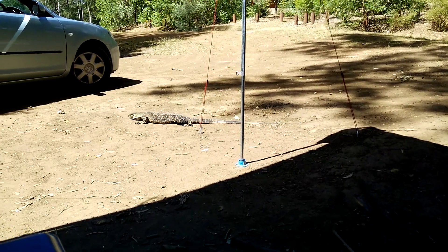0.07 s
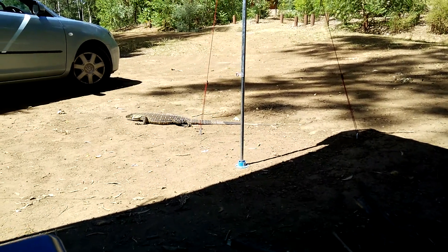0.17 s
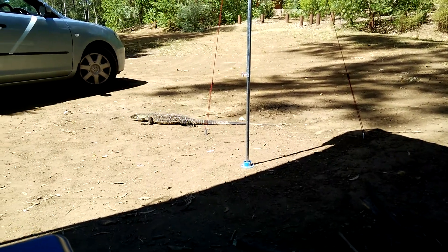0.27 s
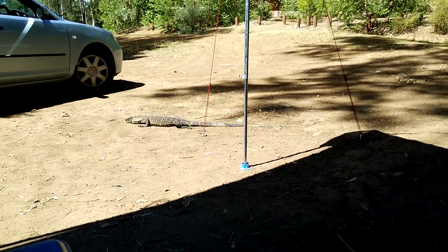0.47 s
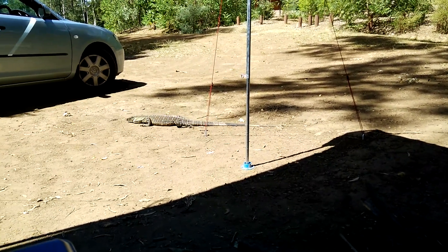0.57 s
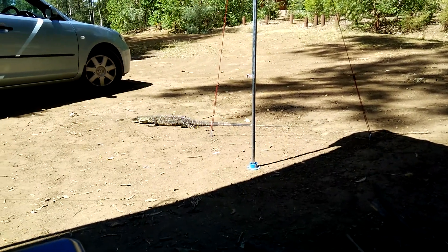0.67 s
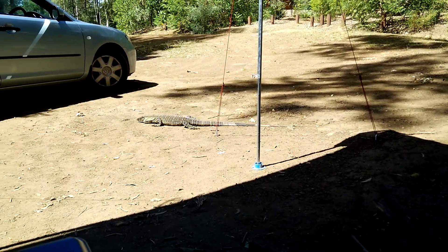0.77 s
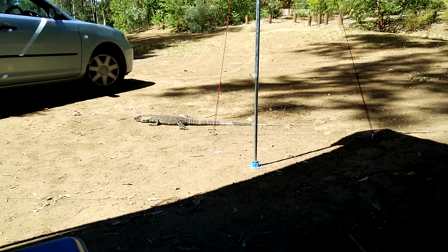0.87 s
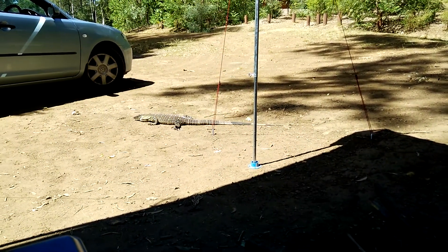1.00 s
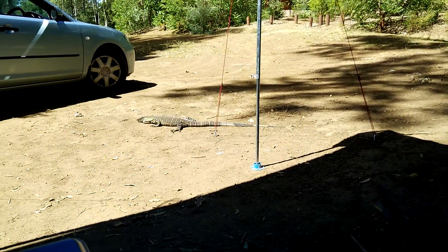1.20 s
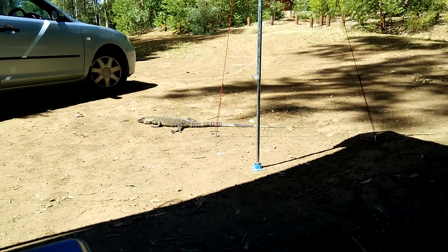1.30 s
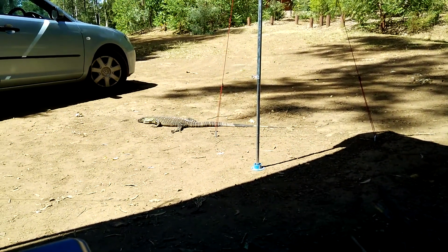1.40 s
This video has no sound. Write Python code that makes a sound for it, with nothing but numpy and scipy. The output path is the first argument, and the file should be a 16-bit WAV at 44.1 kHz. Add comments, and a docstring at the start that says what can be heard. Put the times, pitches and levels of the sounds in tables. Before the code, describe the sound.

A high, flickering insect hiss carries on over the low hum and thump of a small motor in a dry clearing. A quick rising birdlike squeak ends in a soft bump, then a sharp knock sounds close by.

```python
"""Hiss and motor in a dry clearing

A high, insect-like hiss flickers over the low hum and thump of a small motor, and surges on a few
strong beats. A thin whistle comes and goes. One rising, bird-like squeak ends in a soft bump and
scuffle, and a sharp knock and a few faint taps sound close by, each a click with a brief ring.
Far birds, a low rustle and still air lie behind it all."""
import sys
import numpy as np
from scipy import signal
from scipy.fft import rfft, irfft
from scipy.io import wavfile
from scipy.ndimage import uniform_filter1d

SR = 44100
rng = np.random.default_rng(int(sys.argv[2]) if len(sys.argv) > 2 else 0)


def wav_record(signal):
    """Record a signal, one row per channel, as 16-bit PCM in the file named by sys.argv[1]."""
    frames = np.transpose(np.atleast_2d(signal))
    bounded = np.clip(frames, -1, 1)
    # unit amplitude maps onto the largest positive 16-bit level
    quanta = np.round(bounded * 32767).astype(np.int16)
    wavfile.write(sys.argv[1], SR, quanta)


N = 63945
BEAT_HZ, BEAT_AT_S = 26.87, .398  # the motor's beats per second, and the time of one beat


def undb(db):
    """Turn decibels into a number to multiply by."""
    return 10 ** (np.asarray(db) / 20)


def unit(x):
    """Scale a signal to an average (rms) size of 1."""
    return x / np.sqrt(np.mean(x ** 2))


def curve(t, rows, axis=1):
    """Join one column of a table with straight lines."""
    rows = np.array(rows, float)
    return np.interp(t, rows[:, 0], rows[:, axis])


def colour(x, points):
    """Filter a sound through (Hz, dB) points."""
    size = 2 ** 17
    hz, db = np.array(points, float).T
    bins_hz = np.maximum(np.arange(size // 2 + 1) * SR / size, 1)
    gain = undb(np.interp(np.log(bins_hz), np.log(hz), db))
    cepstrum = irfft(np.log(gain))
    cepstrum[1:size // 2] *= 2  # folded so the filter rings after a sound, never before
    cepstrum[size // 2 + 1:] = 0
    return irfft(rfft(x, size) * np.exp(rfft(cepstrum)))[:N]


def noise(points):
    """Noise of size 1, shaped by (Hz, dB) points."""
    return unit(colour(rng.standard_normal(N), points))


def drift(rate):
    """A smooth random wander of size 1, with `rate` steps a second."""
    steps = rng.standard_normal(2 ** 12)
    held = steps[(np.arange(N) * rate / SR).astype(int)]
    return unit(uniform_filter1d(held, int(SR / rate)))


def ring(t, hz, t60):
    """A tone that starts at t = 0 and fades by 60 dB in its ring time, t60."""
    age = np.maximum(t, 0)
    return np.sin(2 * np.pi * hz * age) * np.exp(-np.log(1000) * age / t60)


# Beats that stand out. Each row: time in seconds, extra level in dB.
ACCENTS = [(.324, 7.5), (.621, 5.5), (0.991, 6.5), (1.108, 1.5)]
SURGE_S = .0058  # how far a surge spreads to each side of its peak

def accent(t):
    """Extra dB for the hiss and the thumps around the strong beats."""
    return sum(db * np.exp(-((t - at) / SURGE_S) ** 2) for at, db in ACCENTS)


# The tone of the hiss. Each row: frequency in Hz, level in dB.
HISS_COLOUR = [(2500, -34.5), (3200, -23), (3600, -13), (4020, -4.5), (4300, -10.5), (4690, -8),
               (4850, -4.5), (5080, -3), (5300, -1), (5450, 0), (5620, -1.5), (6000, -9.5), (6500, -22),
               (7200, -34.5), (8500, -45)]

def insect_hiss(t):
    """A shrill, flickering hiss that surges on a few strong motor beats."""
    turns = (t - BEAT_AT_S) * BEAT_HZ
    from_beat_s = (turns - np.round(turns)) / BEAT_HZ
    ripple_db = .5 * np.exp(-(from_beat_s / SURGE_S) ** 2) * (1 + .15 * drift(BEAT_HZ))
    hiss = noise(HISS_COLOUR)
    flicker_db = 1.5 * drift(170)
    return undb(-61) * unit(hiss * undb(ripple_db + accent(t) + flicker_db))


# The tones of the hum. Each row: multiple of the beat rate, level in dB.
HUM_TONES = [(2, -63), (3, -78), (4, -68), (5, -62), (6, -74)]
# How all but the lowest tone swell. Each row: time in seconds, change in dB.
UPPER_HUM_SWELL = [(0, -3.5), (.27, -1.5), (.67, 3.5), (.9, 2.5), (1.45, -4.5)]
# What each beat sets ringing. Each row: pitch in Hz, ring time in seconds, level in dB.
THUMP_RINGS = [(95, 0.16, -1.5), (118, .06, -13.5)]
THUMP_LEAD_S, THUMP_JITTER_S, THUMP_SCATTER_DB = .003, .002, 4

def motor(t):
    """A small motor hums on multiples of its beat and thumps a little unevenly at each beat."""
    turns = (t - BEAT_AT_S) * BEAT_HZ
    tones = [np.sqrt(2) * undb(db) * np.cos(2 * np.pi * k * turns) for k, db in HUM_TONES]
    hum = tones[0] + undb(curve(t, UPPER_HUM_SWELL)) * sum(tones[1:])
    beats = BEAT_AT_S + np.arange(np.floor(turns[0]), turns[-1]) / BEAT_HZ
    kicks = np.zeros(N)
    for at, (late, size) in zip(beats, rng.standard_normal((len(beats), 2))):
        start = int((at - THUMP_LEAD_S + THUMP_JITTER_S * late) * SR)
        if 0 <= start < N:
            kicks[start] = undb(THUMP_SCATTER_DB * size + accent(at))
    body = sum(undb(db) * ring(t, hz, t60) for hz, t60, db in THUMP_RINGS)
    thumps = unit(signal.fftconvolve(kicks, body)[:N])
    return hum + undb(-67) * thumps


# The squeak's rise. Each row: time in seconds, pitch in Hz, level in dB before filtering.
SQUEAK_GLIDE = [(.212, 1912, -80), (.227, 2143, -46.5), (.233, 2250, -47), (.238, 2310, -35.5),
                (.243, 2440, -41), (.2472, 2583, -43.5), (.2495, 2618, -24), (.252, 2750, -31),
                (.254, 2897, -38.5), (.261, 2964, -49.5)]
# Its harmonics. Each row: multiple of the pitch, level in dB.
SQUEAK_TONES = [(1, -1), (2, 0), (3, -1), (4, 1)]
# The resonance that filters them. Each row: frequency in Hz, boost or cut in dB.
SQUEAK_RESONANCE = [(1900, -12), (2300, -23), (2650, -29), (2900, -15.5), (3600, -15), (4250, -18.5),
                    (4650, 0.5), (5400, -1), (6000, -2), (6500, -13), (7100, -23.5), (8200, -41),
                    (12000, -48)]

def squeak(t):
    """A quick upward glide whose second harmonic crosses a resonance; a short tail follows."""
    hz = curve(t, SQUEAK_GLIDE) * (1 + .006 * drift(740))  # a slightly rough pitch
    phase = 2 * np.pi * np.cumsum(hz) / SR
    outside_s = np.maximum(SQUEAK_GLIDE[0][0] - t, 0) + np.maximum(t - SQUEAK_GLIDE[-1][0], 0)
    strength = np.sqrt(2) * undb(curve(t, SQUEAK_GLIDE, axis=2)) * np.exp(-outside_s / .006)
    tones = sum(undb(db) * np.sin(k * phase) for k, db in SQUEAK_TONES)
    direct = colour(strength * tones, SQUEAK_RESONANCE)
    fade = np.exp(-np.log(1000) * t / .06)  # down 60 dB in .06 seconds
    tail = unit(rng.standard_normal(N) * fade) / np.sqrt(N)
    return direct + undb(-12) * signal.fftconvolve(direct, tail)[:N]


# Bumps under the squeak. Each row: start in seconds, level in dB, pitch in Hz, ring time in seconds.
SOFT_BUMPS = [(0.2461, -33, 85.5, .035), (0.2665, -45.5, 110, 0.041)]
# The tone of the rub. Each row: frequency in Hz, level in dB.
RUB_COLOUR = [(120, -6), (280, 0.5), (650, 0), (1050, -10), (1600, -24.5), (3000, -24.5), (4200, -3),
              (5400, -24), (7000, -17.5), (10000, -48), (14000, -40)]
RUB_AT_S, RUB_RISE_S, RUB_HOLD_S, RUB_FADE_S = .246, .0062, .014, .0039

def scuffle(t):
    """Two soft bumps with a short, dull rub between them."""
    age = t - RUB_AT_S
    rise = np.clip(age / RUB_RISE_S, 0, 1)
    fade = np.exp(-np.maximum(age - RUB_RISE_S - RUB_HOLD_S, 0) / RUB_FADE_S)
    bumps = sum(undb(db) * ring(t - at, hz, t60) for at, db, hz, t60 in SOFT_BUMPS)
    return bumps + undb(-46.5) * rise * fade * noise(RUB_COLOUR)


# The knock and taps. Each row: start in seconds, click's peak in dB, treble tilt in dB per octave.
BLOWS = [(0.1487, -46.5, 3), (0.1721, -51, -1), (0.383, -43.5, -0.5), (0.8268, -22, 2.5),
         (0.849, -54.5, -5), (0.9214, -47.5, -4.5)]
# The tone of the knocked object. Each row: frequency in Hz, level in dB.
CLICK_COLOUR = [(40, -9), (120, 10.5), (350, 2.5), (520, 7.5), (800, 1.5), (1000, 4), (1800, -4.5),
                (2400, -13.5), (3000, -14.5), (4200, -15.5), (5400, -10.5), (6000, -13), (6600, -18),
                (8400, -37.5), (10300, -31.5), (12000, -52), (14000, -55)]
# What rings on. Each row: pitch in Hz, ring time in seconds, dB compared with the click's peak.
KNOCK_RINGS = [(121.3, 0.11, -24.5), (530, .014, -29), (5390, 0.038, -29), (5750, 0.017, -27)]

def knocks(t):
    """Dry blows on one well-damped object: a click, then a brief ring. Some are dull, some crisp."""
    out = np.zeros(N)
    for at, db, tilt in BLOWS:
        treble_db = lambda hz: tilt * np.log2(max(hz / 1000, 1))
        blow = signal.unit_impulse(N, int(at * SR))
        click = colour(blow, [(hz, level + treble_db(hz)) for hz, level in CLICK_COLOUR])
        rings = sum(undb(level + treble_db(hz)) * ring(t - at, hz, t60)
                    for hz, t60, level in KNOCK_RINGS)
        out += undb(db) * (click / np.abs(click).max() + rings)
    return out


# How the whistle comes and goes. Each row: time in seconds, level in dB.
WHISTLE_LEVEL = [(0, -83), (.1, -97), (.15, -69), (.2, -66.5), (.225, -62.5), (.26, -59), (.3, -78),
                 (.326, -66), (.37, -78.5), (.78, -78), (.83, -71.5), (.88, -79), (1.05, -81),
                 (1.09, -71.5), (1.22, -79), (1.275, -71.5), (1.35, -89.5), (1.396, -75), (1.45, -91)]
WHISTLE_HZ, WHISTLE_WOBBLE_HZ = 2869, 27

def whistle(t):
    """A thin, fluttering tone that swells and fades."""
    hz = WHISTLE_HZ + WHISTLE_WOBBLE_HZ * drift(130)
    tone = np.sqrt(2) * np.sin(2 * np.pi * np.cumsum(hz) / SR)
    flutter = unit(1 + .47 * drift(150))
    return tone * flutter * undb(curve(t, WHISTLE_LEVEL))


# Bird notes. Each row: start and length in seconds, first and last pitch in Hz, level in dB.
BIRD_NOTES = [(.9, 0.053, 3660, 3220, -67), (0.988, 0.0517, 4690, 4100, -65)]
# How a distant tone swells and dips. Each row: time in seconds, change in dB.
TONE_SWELL = [(0, -0.5), (.5, -1), (.9, -9.5), (1.12, 1), (1.28, -9.5), (1.45, -6)]
TONE_HZ, TONE_DB = 825, -90

def far_birds(t):
    """Faint, blurred falling notes over a barely audible tone in the distance."""
    out = undb(TONE_DB + curve(t, TONE_SWELL)) * np.sin(2 * np.pi * TONE_HZ * t)
    for at, length, start_hz, end_hz, db in BIRD_NOTES:
        progress = np.clip((t - at) / length, 0, 1)
        hz = end_hz + (start_hz - end_hz) * (1 - progress) ** 2
        hz *= 1 + .047 * drift(450)  # a fast wobble blurs the pitch
        out += undb(db) * np.sin(np.pi * progress) * np.sin(2 * np.pi * np.cumsum(hz) / SR)
    return np.sqrt(2) * out


# How loud the rustle is. Each row: time in seconds, level in dB.
RUSTLE_LEVEL = [(0, -85.5), (.2, -72), (.33, -79.5), (.5, -81), (.8, -81), (1.05, -89), (1.45, -99)]
# Its tone. Each row: frequency in Hz, level in dB.
RUSTLE_TONE = [(80, -6), (200, -2.5), (380, 0.5), (700, -12), (1600, -14.5), (4000, -29.5)]

def rustle(t):
    """A faint, uneven low rustle that dies away."""
    return noise(RUSTLE_TONE) * undb(curve(t, RUSTLE_LEVEL) + 3.8 * drift(30))


# The air in the middle. Each row: frequency in Hz, level in dB.
AIR_COLOUR = [(20, -8.5), (45, -6), (90, -0.5), (170, -7), (260, -14.5), (500, -22), (1000, -27),
              (2200, -21.5), (6000, -24), (10000, -32), (12000, -33), (14500, -34)]
# The air at the sides. Each row: frequency in Hz, level in dB.
WIDE_COLOUR = [(3000, -33.5), (6000, -21.5), (7200, -2.5), (10000, -1), (14000, -6.5)]

def still_air():
    """Quiet, steady noise whose faint treble spreads left and right."""
    middle = undb(-73.5) * noise(AIR_COLOUR)
    side = undb(-89) * noise(WIDE_COLOUR)
    return np.array([middle + side, middle - side])


def scene():
    """Everything sits in the middle; only the air has width."""
    t = np.arange(N) / SR
    middle = motor(t) + insect_hiss(t) + whistle(t) + squeak(t) + scuffle(t) + knocks(t)
    return middle + far_birds(t) + rustle(t) + still_air()


def record(dry):
    """The recorder cuts the treble above 14300 Hz."""
    return signal.sosfilt(signal.ellip(10, .2, 70, 14300, fs=SR, output="sos"), dry)


dry = scene()
out = record(dry)
wav_record(out)
```